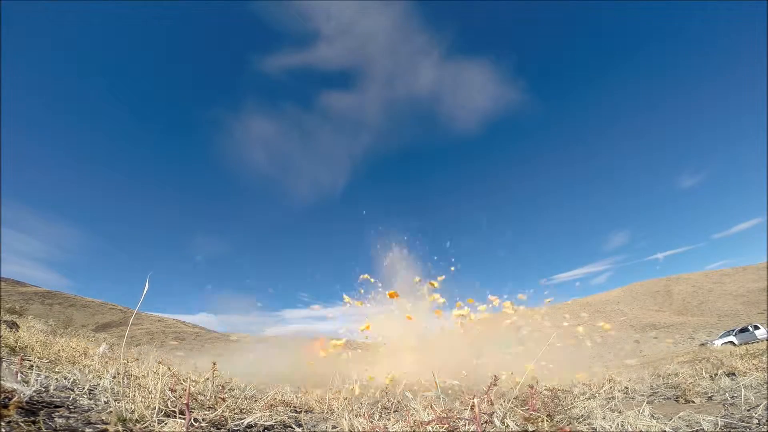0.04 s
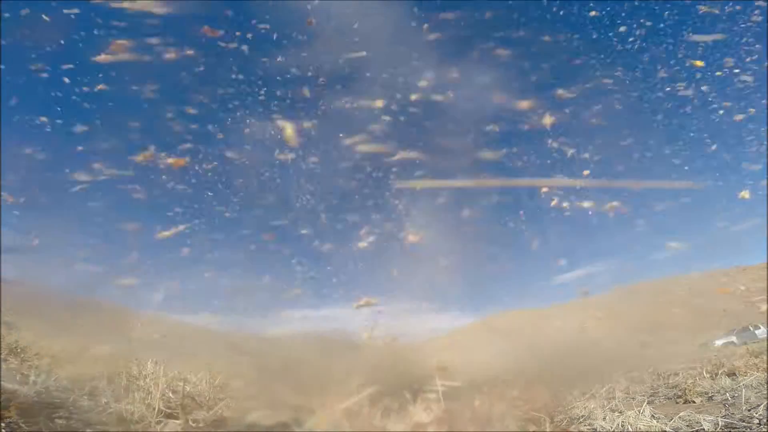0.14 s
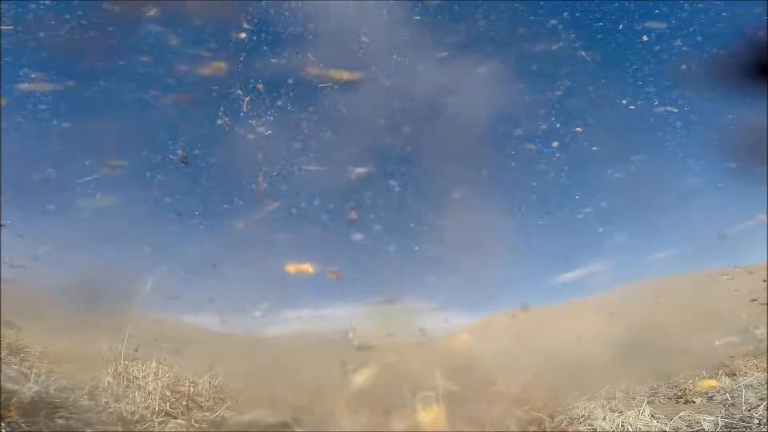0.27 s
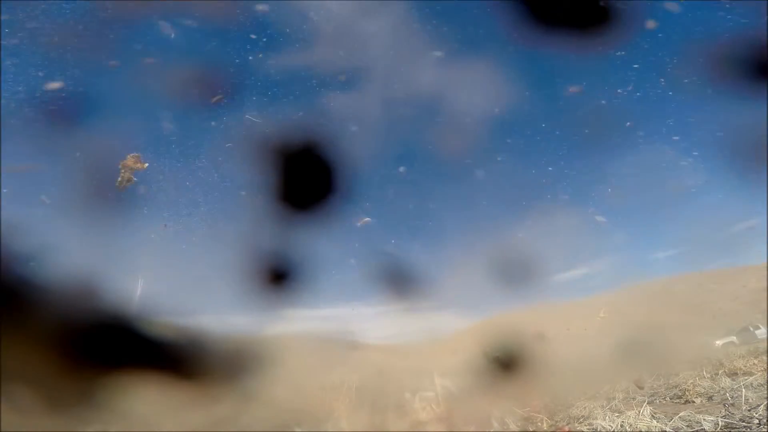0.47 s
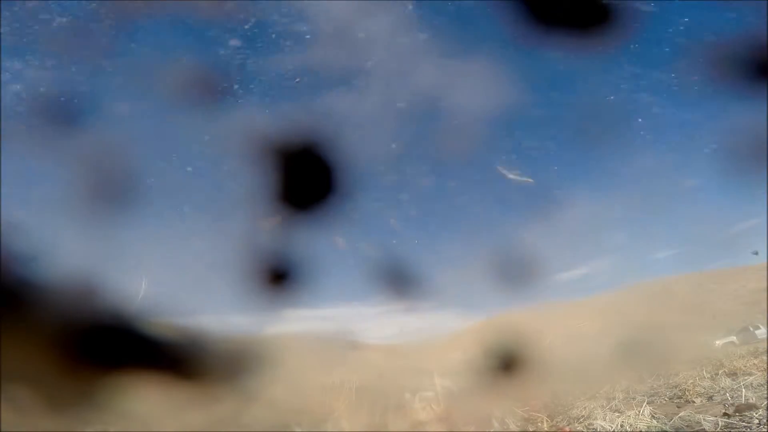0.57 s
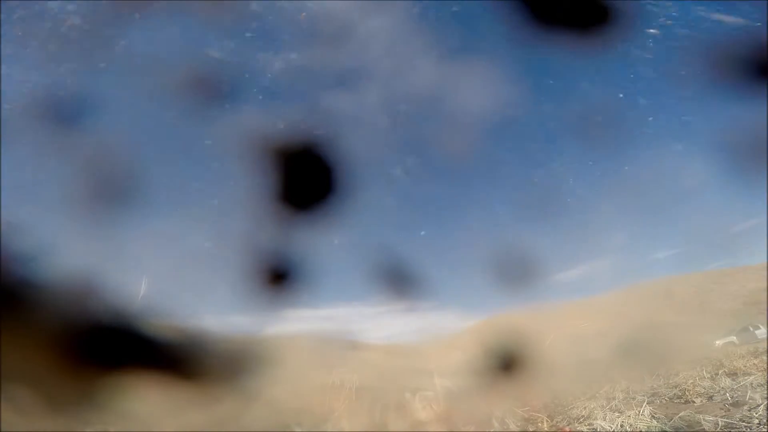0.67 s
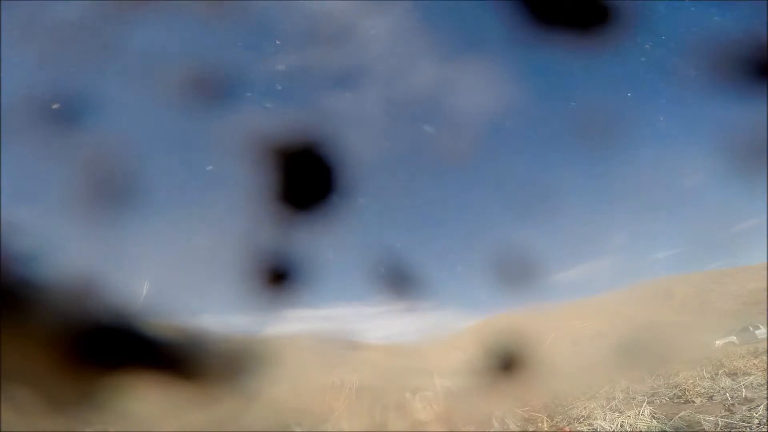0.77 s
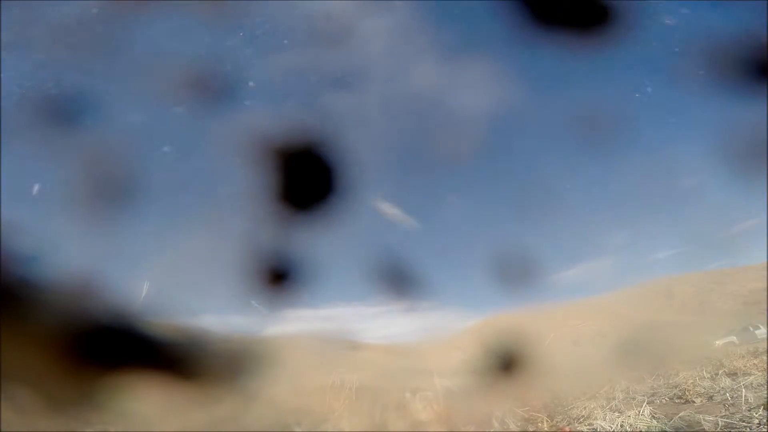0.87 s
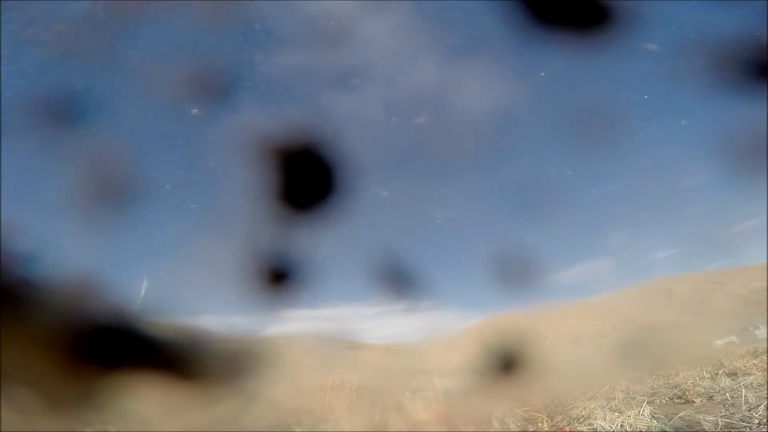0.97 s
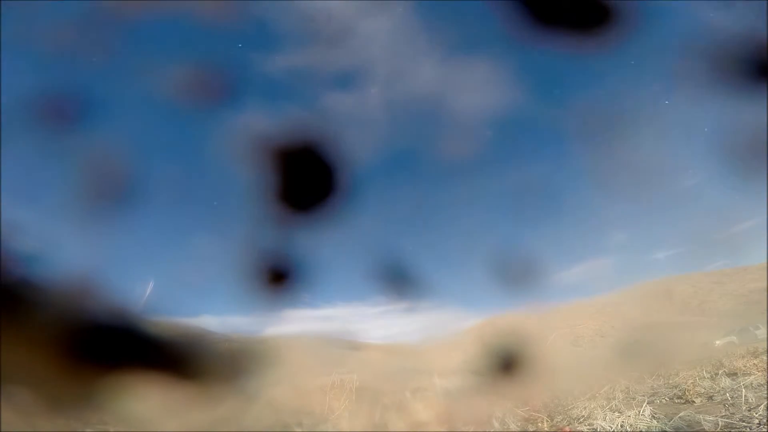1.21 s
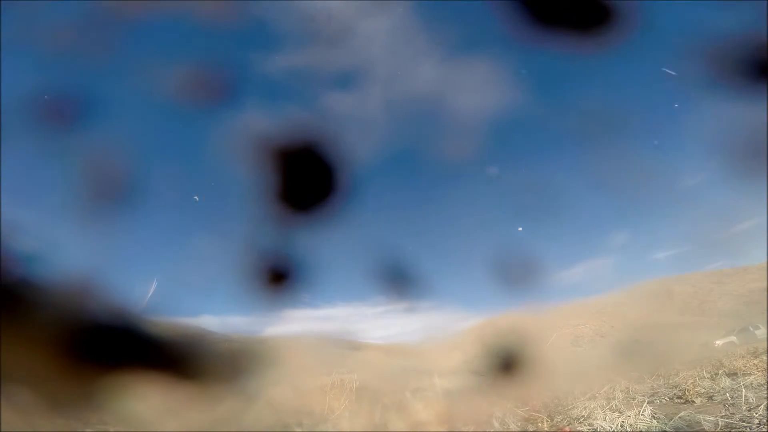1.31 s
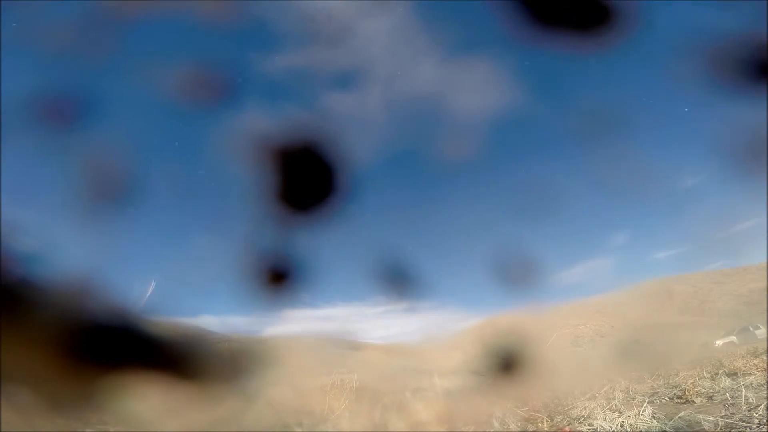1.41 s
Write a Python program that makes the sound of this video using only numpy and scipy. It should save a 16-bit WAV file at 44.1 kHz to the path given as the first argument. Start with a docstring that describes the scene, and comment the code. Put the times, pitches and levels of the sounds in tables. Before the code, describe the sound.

A sudden loud blast cracks a pumpkin apart outdoors, with a brief echo. A dense scatter of wet pieces knocks and splats on and around the microphone on the ground, dwindling to a few last drops over faint wind.

```python
"""A pumpkin is blown up in an open field, a few metres from a small camera on the ground.
At first there is only light wind and a faint electronic whine. Then the shock wave overloads the
microphone, the rind cracks and an echo fades over the hills. Wet chunks slap the camera and make its
housing ring, pulp patters into the dry grass, and hollow pieces of rind plop on the soil. The camera
turns its gain down after the blast, so the background ducks, then slowly recovers as the last bits drop."""
import sys
import numpy as np
from scipy import signal
from scipy.fft import rfft, irfft, next_fast_len
from scipy.io import wavfile

SR = 44100
rng = np.random.default_rng(int(sys.argv[2]) if len(sys.argv) > 2 else 0)


def wav_record(signal):
    """Record a signal, one row per channel, as 16-bit PCM in the file named by sys.argv[1]."""
    frames = np.transpose(np.atleast_2d(signal))
    bounded = np.clip(frames, -1, 1)
    # unit amplitude maps onto the largest positive 16-bit level
    quanta = np.round(bounded * 32767).astype(np.int16)
    wavfile.write(sys.argv[1], SR, quanta)


N = 63945

# chunks hitting the camera and the ground beside it, with relative levels:
# t/s, thud level/dB, knock level/dB, knock f/Hz, splat level/dB, splat f/Hz
CHUNK_HITS = [(0.2397, -44, -23.5, 1880, -18, 6610), (0.2473, -41, -13.5, 4820, -18, 5680),
              (0.2624, -31, -31, 2030, -39, 6000), (0.273, -49, -20, 2270, -37, 6900),
              (0.2804, -15.5, -11, 3720, -23, 7740), (0.2945, -68, -38, 3140, -30, 6000),
              (0.3097, -55, -42, 3250, -53, 5000), (0.3278, -31.5, -21.5, 2670, -22.5, 6700),
              (0.3521, -24, -11.5, 1647, -15, 6100), (0.383, -66, -38, 4400, -46, 6400),
              (.3885, -69, -27.5, 2860, -34, 6300), (0.4108, -78, -38.5, 2490, -45, 7000),
              (.4453, -77, -40, 2690, -43.5, 13600), (0.4611, -48.5, -33, 3970, -30.5, 6500),
              (.465, -32.5, -19, 2420, -23, 6500), (.469, -31, -25.5, 1506, -52, 6000),
              (0.4778, -37, -26, 2450, -24, 7600), (0.4834, -39, -31.5, 2700, -33, 5840),
              (0.4886, -53, -33, 2610, -36, 6670), (0.4964, -32.5, -25.5, 2480, -35, 5900),
              (0.5009, -49, -29, 2720, -35, 5000), (0.512, -41, -26, 1860, -17.5, 6370),
              (0.523, -53, -30, 2730, -24.5, 6170), (0.5318, -40.5, -18.5, 2550, -30, 6450),
              (.535, -44.5, -24, 2530, -41, 5920), (.5425, -55, -36.5, 2630, -40, 9040),
              (0.5619, -43, -37, 2600, -42, 6750), (0.579, -33, -35, 1130, -30.5, 5940),
              (.646, -68, -52, 3850, -45, 7400), (0.6644, -56, -44, 1680, -52, 6500),
              (.6702, -74, -45, 2750, -42, 7400), (0.711, -47, -62, 2640, -56, 6100),
              (0.7465, -48, -59, 2650, -59, 6000), (0.7551, -53, -67, 1010, -41, 6500),
              (0.8173, -54, -59.5, 3370, -49.5, 7560), (0.8426, -74, -56, 2600, -76, 6100),
              (0.9108, -66, -49, 2510, -74, 5950), (0.9274, -60.5, -39, 4370, -34, 14100),
              (1.0696, -68.5, -57.5, 2535, -59.5, 7000), (1.2114, -68, -52, 3060, -72.5, 5000),
              (1.2251, -53.5, -31, 2410, -40.5, 14300)]


def undb(db):
    """Turn decibels into a factor to multiply by."""
    return 10 ** (np.asarray(db) / 20)


def unit(x):
    """Scale a sound to an average (rms) strength of 1."""
    return x / np.sqrt(np.mean(x ** 2))


def curve(points):
    """Loudness over time, drawn through rows of t/s, level/dB."""
    return undb(np.interp(np.arange(N) / SR, *np.array(points).T))


def colour(x, points):
    """Shape the tone of a sound with rows of f/Hz, level/dB."""
    size = next_fast_len(len(x) + 4096)
    hz, db = np.array(points).T
    f = np.maximum(np.arange(size + 1) * SR / (2 * size), 1)
    gain = undb(np.interp(np.log(f), np.log(hz), db))
    cepstrum = irfft(np.log(gain))
    cepstrum[1:size] *= 2  # fold the filter so that nothing sounds before its hit
    cepstrum[size + 1:] = 0
    return irfft(rfft(x, 2 * size) * np.exp(rfft(cepstrum)))[:len(x)]


def cut(x, hz, kind, order):
    """Keep the "low" or the "high" side of a frequency."""
    return signal.sosfilt(signal.butter(order, hz, kind, fs=SR, output="sos"), x)


def add(out, start_s, x):
    """Mix x into out from a given time."""
    i = int(start_s * SR)
    out[i:i + len(x)] += x[:len(out) - i]


def burst(decay_s, size):
    """Noise that starts at once and dies away."""
    return rng.choice([-1., 1.], size) * np.exp(-np.arange(size) / SR / decay_s)


def ring(hz, decay_s, size=2048):
    """One tone of a struck object, dying away."""
    age = np.arange(size) / SR
    return np.sin(2 * np.pi * hz * age) * np.exp(-age / decay_s)


def wet_hit(tone, decay_s, size=2048):
    """A short wet hit, with a faint tail as the pulp spreads."""
    return colour(burst(decay_s, size) + undb(-25.5) * burst(0.0044, size), tone)


def at_level(x, db, contact_s=0.004):
    """Set how loud a hit is during its first moment of contact."""
    return x * undb(db) / np.sqrt(np.mean(x[:int(contact_s * SR)] ** 2))


def grains(tone, per_second=450, spread_db=3):
    """Tiny hits of very unequal size at random times."""
    hits = rng.random(N) < per_second / SR
    strength = undb(spread_db * np.minimum(rng.exponential(size=N), 4))
    shape = rng.integers(6, size=N)  # each hit is one of six different clicks
    clicks = sum(signal.fftconvolve(hits * strength * (shape == k), burst(0.0013, size=512))[:N]
                 for k in np.unique(shape))
    return unit(colour(clicks, tone))


def whine():
    """The camera's electronics give off thin, steady tones."""
    tones = [(5845, -82), (8780, -86.5), (11710, -82.5), (14630, -83.5)]  # faint high tones: f/Hz, level/dB
    t = np.arange(N) / SR
    return sum(undb(db) * unit(np.sin(2 * np.pi * hz * t)) for hz, db in tones)


def wind():
    """Light wind blows over the field, and air rumbles at the microphone's opening."""
    # tone of the breeze and of the rumble: f/Hz, level/dB
    breeze_tone = [(20, -10), (45, -5.5), (80, -6.5), (150, 1), (300, -7), (600, -11.5), (1200, -15.5),
                   (3000, -23), (8000, -34.5), (16000, -39)]
    rumble_tone = [(10, -10), (30, -1.5), (55, -3), (100, -11), (300, -40), (1000, -70.5)]
    # drawn levels that duck as the camera turns its gain down, then slowly recover: t/s, level/dB
    breeze_levels = [(0, -53), (.2, -54.5), (.42, -71), (.6, -60.5), (.8, -61), (1.05, -61.5), (1.25, -56),
                     (1.45, -54)]
    rumble_levels = [(0, -55.5), (.2, -65), (.3, -66), (.42, -56), (.51, -60), (.59, -80), (1.05, -69),
                     (1.2, -60.5), (1.45, -55.5)]
    breeze = curve(breeze_levels) * unit(colour(rng.standard_normal(N), breeze_tone))
    rumble = curve(rumble_levels) * unit(colour(rng.standard_normal(N), rumble_tone))
    return breeze + rumble


def spray():
    """Pulp and seeds patter dully on the soil and tick brightly on dry grass."""
    # how the spray swells and thins out: t/s, relative level/dB
    spray_levels = [(.21, -69), (.27, -51), (.33, -45), (.43, -55.5), (.458, -36), (.47, -23), (.53, -32.5),
                    (.565, -36), (.61, -47), (.69, -51.5), (.8, -56.5), (1.0, -61), (1.2, -60),
                    (1.3, -72.5), (1.45, -78)]
    # tone of hits on soil and on grass: f/Hz, level/dB
    patter_tone = [(200, -16), (600, -8.5), (1300, -1.5), (1800, 2), (2100, -6.5), (2650, 7.5),
                   (3500, -8.5), (6000, -9.5), (12000, -31.5)]
    tick_tone = [(2500, -18), (4500, -6), (7000, -3), (11000, -8), (15000, -9.5), (16500, -25.5)]
    return curve(spray_levels) * (undb(-5) * grains(patter_tone) + undb(-12.5) * grains(tick_tone))


def rinds():
    """Curved pieces of rind land with a short hollow plop and a dull scuff of soil."""
    # pieces landing: t/s, plop level/dB, lowest f/Hz
    landings = [(.582, -34, 476), (0.714, -53, 730), (.749, -38.5, 1000), (0.9479, -49.5, 1128)]
    # tones of a hollow piece: multiple of its lowest frequency, relative level/dB, decay time/s
    plop_tones = [(1, -7.5, 0.01), (1.6, -0.5, 0.0072), (2.62, 7, 0.0034)]
    # tone of scuffed soil: f/Hz, level/dB
    soil_tone = [(60, -14), (140, -1), (300, -7), (500, -4), (900, 0.5), (1600, -1), (3000, -17.5),
                 (8000, -49)]
    out = np.zeros(N)
    for start, db, hz in landings:
        plop = sum(undb(tone_db) * ring(hz * ratio, decay) for ratio, tone_db, decay in plop_tones)
        scuff = wet_hit(soil_tone, decay_s=0.0071)
        add(out, start, at_level(plop, db) + at_level(scuff, db - 4.5))
    return out


def housing():
    """Hard knocks set the camera's housing ringing, until pulp coats it and damps it."""
    # tones of the clean housing and mount at the hardest knock: f/Hz, level/dB, time to fade 60 dB/s
    tones = [(1811, -40.5, 0.49), (2300, -46, 0.12), (2690, -24, 0.032), (3030, -49.5, 0.31),
             (4285, -33, 0.074), (4650, -44.5, .08), (5276, -40.5, .07), (5740, -33.5, .06),
             (6650, -53.5, .16), (8280, -46, .045)]
    ring_per_knock = 0.81  # dB of ringing per dB of knock: light bits hardly shake it
    coated_s, coated_decay_s = 0.477, 0.12
    blows, out, t = np.zeros(N), np.zeros(N), np.arange(N) / SR
    hardest_db = max(knock_db for _, _, knock_db, *_ in CHUNK_HITS)
    for start, _, knock_db, *_ in CHUNK_HITS:
        add(blows, start, undb([ring_per_knock * (knock_db - hardest_db)]) ** 2)
    for hz, db, fade_s in tones:
        kept_per_sample = np.exp(-2 * np.log(1000) / (fade_s * SR))
        energy = signal.lfilter([1], [1, -kept_per_sample], blows)
        out += undb(db) * np.sqrt(2 * energy) * np.sin(2 * np.pi * (hz * t + rng.random()))
    return out * np.exp(-np.maximum(t - coated_s, 0) / coated_decay_s)


def air_push():
    """A heavy slap pushes air into the microphone's opening, and it slowly leaks back out."""
    slaps = [(0.2396, -7, 0.00063)]  # pulse of air: t/s, level/dB, rise time/s
    out, age = np.zeros(N), np.arange(N) / SR
    for start, db, rise_s in slaps:
        add(out, start, -undb(db) * age / rise_s * np.exp(1 - age / rise_s))
    return cut(out, 24, "high", order=2)


def chunks():
    """Each wet chunk lands with a low thud, plus a knock and a bright splat that each have a pitch."""
    # tone of the three parts of a hit: f/Hz, level/dB
    thud_tone = [(30, -15), (120, -3.5), (350, 1.5), (700, -0.5), (950, -13.5), (3000, -48.5)]
    knock_tone = [(300, -35.5), (800, -23.5), (1250, -10.5), (1620, 0.5), (2050, -3), (2700, 1), (3400, -1),
                  (3900, -7.5), (4600, 2), (5400, -8), (6500, -16.5), (12000, -33)]
    splat_tone = [(2500, -32), (4500, -18), (6200, 1.5), (8000, -2), (8700, -5.5), (10800, -4.5),
                  (12200, -5.5), (15000, -21), (16500, -35)]
    out = np.zeros(N)
    for start, thud_db, knock_db, knock_hz, splat_db, splat_hz in CHUNK_HITS:
        knock = at_level(wet_hit(knock_tone, decay_s=0.0018), db=0)
        knock += at_level(ring(knock_hz, decay_s=0.0022), db=-1)
        splat = at_level(wet_hit(splat_tone, decay_s=0.0012), db=0)
        splat += at_level(ring(splat_hz, decay_s=0.001), db=-2)
        thud = at_level(wet_hit(thud_tone, decay_s=0.00085), thud_db - 3)
        add(out, start, thud + at_level(knock, knock_db + 0.5) + at_level(splat, splat_db))
    return out


def blast():
    """The shock wave pushes, then pulls the air; the bursting rind cracks and the field echoes."""
    # tone of the crack and of the echo: f/Hz, level/dB
    crack_tone = [(300, -12.5), (600, -12), (800, -6), (950, 0), (1250, -1.5), (1800, -11), (2250, -6),
                  (2680, 4), (3350, 0), (4200, -21.5), (5200, -17), (6200, -11), (10000, -25), (16000, -39)]
    echo_tone = [(40, -3.5), (150, 0), (400, -15.5), (1000, -11), (2700, -3.5), (6000, -17), (16000, -32.5)]
    start_s, push_s, crack_decay_s, echo_decay_s = 0.2067, 0.00128, 0.0026, 0.098
    out, age = np.zeros(N), np.arange(N) / SR
    shock = -(1 - age / push_s) * (age < 2 * push_s)  # a jump, a straight slope and a jump back
    shock = cut(shock, 72, "high", order=2)  # the microphone's opening loses the deep bass
    shock = cut(shock, 313, "low", order=1)  # round off the sharp edges
    crack = unit(colour(rng.standard_normal(N), crack_tone)) * np.exp(-age / crack_decay_s)
    echo = unit(colour(rng.standard_normal(N), echo_tone)) * np.exp(-age / echo_decay_s)
    add(out, start_s, undb(10.5) * shock + undb(-0.5) * crack + undb(-38.5) * echo)
    return out


def scene():
    """The blast, the falling pieces and the background meet at one microphone."""
    return (blast() + chunks() + rinds() + air_push() + housing() + spray() + wind() + whine())[None]


def record(dry):
    """The overloaded camera flattens the loudest peaks, then cuts the highest treble."""
    peak_limit, top_hz = 0.96, 16100
    flattened = np.clip(dry, -peak_limit, peak_limit)
    return signal.sosfilt(signal.ellip(10, .1, 90, top_hz, fs=SR, output="sos"), flattened)


dry = scene()
out = record(dry)
wav_record(out)
```